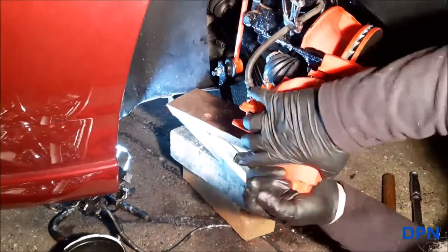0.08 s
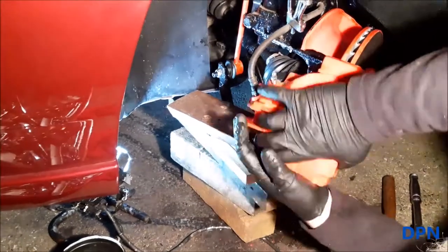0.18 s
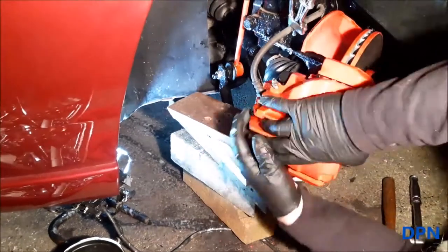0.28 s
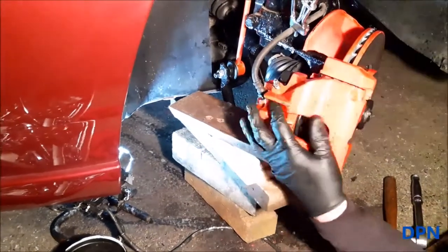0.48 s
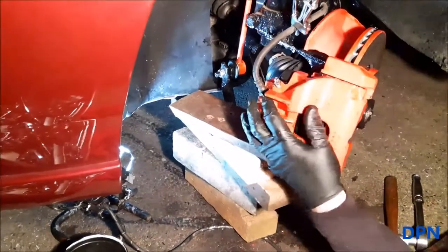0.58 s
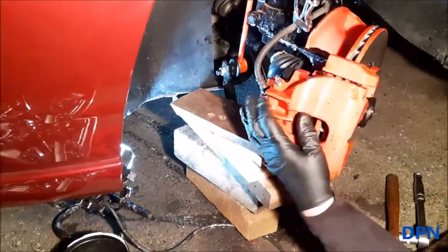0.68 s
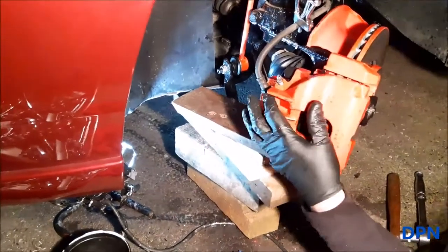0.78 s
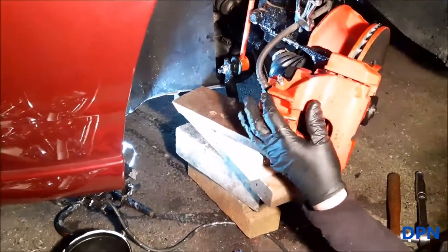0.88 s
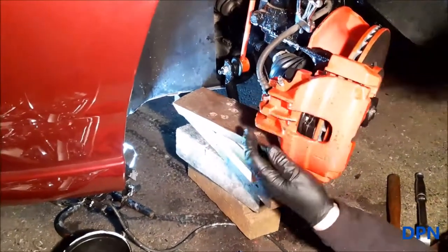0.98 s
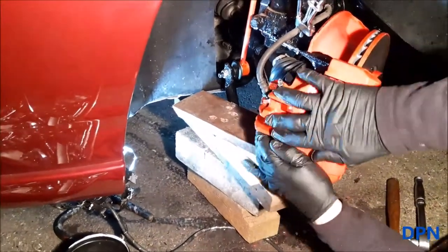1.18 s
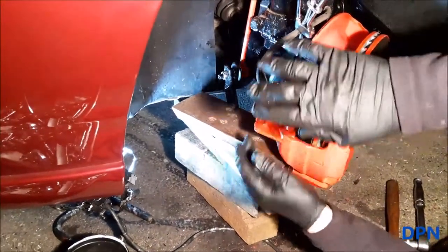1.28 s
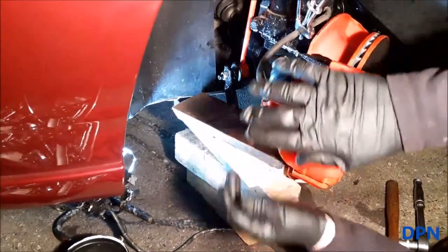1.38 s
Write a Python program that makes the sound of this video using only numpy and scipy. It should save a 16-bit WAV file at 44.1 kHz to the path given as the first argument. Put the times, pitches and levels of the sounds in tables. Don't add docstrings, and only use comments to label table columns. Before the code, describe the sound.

Metal brake caliper knocks, heard close in a quiet garage with a short dull tail. A faint thud and glove rub open; at 0.2 and 0.26 seconds two sharp, bright steel clacks land over a hollow low thud. A rubber glove hisses over paint near 0.37, a lighter clink-thud comes at 0.6, softer rubs follow, then small ticks and dull taps around 1.0 to 1.24, fading to near quiet.

```python
import sys
import numpy as np
from scipy import signal
from scipy.fft import rfft, irfft
from scipy.io import wavfile
from scipy.ndimage import uniform_filter1d

SR = 44100
rng = np.random.default_rng(int(sys.argv[2]) if len(sys.argv) > 2 else 0)


def store_wav(level_fs):
    pcm = np.round(np.clip(np.atleast_2d(level_fs), -1, 1) * 32767)
    wavfile.write(sys.argv[1], SR, pcm.T.astype(np.int16))


def ratio_of_db(decibels):
    return 10 ** (np.asarray(decibels, float) / 20)


N = 61740
TIME_S, FREQ_HZ = np.arange(N) / SR, np.fft.rfftfreq(N, 1 / SR)
BLOW_N = 8192


def evened(x):
    return x / np.sqrt(np.mean(x ** 2) + 1e-20)


def lumpy(n, size):
    return evened(uniform_filter1d(rng.standard_normal(n), size=size))


def read(points, hz):
    f, value = np.transpose(points)
    return np.interp(np.log(hz + 1), np.log(f + 1), value)


def noise(gain):
    return evened(irfft(rfft(rng.standard_normal((2, N))) * gain, N))


def hump(centre_hz, octaves):
    return np.exp(-.5 * (np.log2((FREQ_HZ + 1) / centre_hz) / octaves) ** 2)


# start t/s, fastest t/s, end t/s, level/dB, dull share/dB
STROKES = [
    (-.03, 0.009, 0.09, -52.5, -17.5),
    (0.113, 0.149, 0.19, -69.5, 2.5),
    (0.312, 0.369, 0.56, -41.5, -4.5),
    (0.546, 0.557, 0.72, -69, 11.5),
    (0.612, 0.689, 0.76, -48.5, -2.5),
    (0.745, 0.756, 0.84, -57, 5.5),
    (0.76, 0.839, 1.102, -50, -11),
    (0.93, 1.009, 1.38, -62.5, -2.5),
    (1.086, 1.168, 1.143, -63.5, 14),
    (1.187, 1.226, 1.279, -43.5, -9),
]
# f/Hz, level/dB per Hz
GLOVE_SPECTRUM = [(590, -64), (1000, -7.5), (1570, -31), (1770, -14), (5070, -9), (7190, -7), (8360, -5),
                  (16000, -5)]
# f/Hz, width/Hz, level/dB
SQUEAK = [(2500, 660, 0), (3790, 220, 1.5), (5500, 430, -4), (7170, 750, 0.5), (10100, 260, -20)]


def glove_hiss():
    drift, drift_hz, patch_db = 0.014, 9.9, 2.5
    _, t, z = signal.stft(noise(1), SR, nperseg=256)
    bend = 1 + drift * np.sin(2 * np.pi * drift_hz * t + .5)
    hz = np.fft.rfftfreq(256, 1 / SR)[:, None] / bend
    bands = 1
    for f, width_hz, db in SQUEAK:
        bands = bands + ratio_of_db(db + 11.5) / (1 + (2 * (hz - f) / width_hz) ** 2)
    patch = uniform_filter1d(rng.standard_normal(hz.shape), size=8, axis=0)
    patch = evened(uniform_filter1d(patch, size=30, axis=1))
    colour = bands * ratio_of_db(read(GLOVE_SPECTRUM, hz) + patch_db * patch) * hz / (hz + 700)
    hiss = signal.istft(z * colour, SR, nperseg=256)[1]
    return evened(hiss[:, :N])


def gloves():
    ends_db, grain_db = -34.5, 1
    hiss = glove_hiss()
    drag = noise(hump(1900, 1.48))
    grain = ratio_of_db(grain_db * lumpy(N, 90))
    out = np.zeros((2, N))
    for start, fastest, end, db, dull_db in STROKES:
        away = np.interp(TIME_S, [start, fastest, end], [1, 0, 1])
        out += (away < 1) * ratio_of_db(db + ends_db * away ** 1.443) * (hiss + ratio_of_db(dull_db) * drag)
    return out * grain


# f/Hz, level/dB per Hz
AIR_SPECTRUM = [(120, -33), (220, -3.5), (700, -29.5), (16000, -36)]


def air():
    level_db = -71
    return ratio_of_db(level_db) * noise(ratio_of_db(read(AIR_SPECTRUM, FREQ_HZ)))


def blows(rows, octaves, skirt_db, reach):
    ripple_db, treble_fade = 3, 1.2
    snap, snap_s = 0.32, 0.00013
    out = np.zeros((2, N + BLOW_N))
    t, f = np.arange(BLOW_N) / SR, np.fft.rfftfreq(BLOW_N, 1 / SR)
    for s, db, hz, rise_s, t60_s in rows:
        away = np.log2((f + 1) / hz) / octaves
        colour = np.exp(-.5 * away ** 2) + ratio_of_db(skirt_db) * np.exp(-away ** 2 / 12)
        colour *= ratio_of_db(ripple_db * lumpy(len(f), int(hz / 60)))
        colour /= 1 + (f / (reach * hz)) ** 4
        z = rfft(np.clip(rng.standard_normal((2, BLOW_N)), -1.5, 1.5)) * colour
        treble = 1 / (1 + (1.3 * hz / (f + 1)) ** 4)
        fall_db = -60 * np.maximum(t - rise_s, 0) / t60_s
        burst = irfft(z * (1 - treble)) * ratio_of_db(fall_db) + irfft(z * treble) * ratio_of_db(treble_fade * fall_db)
        shape = np.minimum(t / max(rise_s, 1e-4), 1) * ratio_of_db(db) / np.std(irfft(z))
        shape *= 1 + snap * np.exp(-abs(t - rise_s) / snap_s)
        out[:, round(s * SR):][:, :BLOW_N] += burst * shape
    return out[:, :N]


def ring(x, modes, damp):
    out = np.zeros(x.shape)
    for k, (hz, width_hz, db) in enumerate(modes):
        r = np.exp(-np.pi * width_hz * damp / SR)
        poles = [1, -2 * r * np.cos(2 * np.pi * hz / SR), r * r]
        out += (-1) ** k * ratio_of_db(db) * signal.lfilter([1 - r, 0, r - 1], poles, x)
    return out


# t/s, level/dB
ROCK = [
    (0, -82),
    (.1, -69.5),
    (0.438, -68.5),
    (.53, -76),
    (0.699, -66),
    (0.922, -79.5),
    (1.099, -63),
    (1.25, -59),
    (1.36, -105.5),
]


def creep():
    t, db = np.transpose(ROCK)
    lump_db = 3.5
    lumps = lumpy(N, 500)
    return noise(hump(400, 0.91)) * ratio_of_db(np.interp(TIME_S, t, db) + lump_db * lumps)


# t/s, level/dB, f/Hz (centre), rise/s, t60/s
THUDS = [(.0595, -59.5, 930, 0.0025, 0.028), (.213, -31.5, 1160, 0.0031, 0.17),
         (.240, -35.5, 594, 0.0023, 0.21), (.260, -32.5, 820, 0.0064, 0.2),
         (.341, -40.5, 799, 0.012, 0.065), (.415, -51, 610, 0.0072, 0.031), (.49, -53, 740, 0.0027, 0.031),
         (.604, -35.5, 1560, 0.0036, 0.077), (.610, -39, 700, 0.0033, 0.071),
         (.626, -38, 860, 0.0038, 0.069), (.68, -74, 900, 0.0051, 0.052), (.765, -49, 730, 0.0022, 0.045),
         (.978, -62, 700, 0.0034, 0.03), (1.045, -60.5, 587, 0.003, 0.088),
         (1.113, -52.5, 940, 0.0045, 0.04), (1.155, -38, 737.3, 0.0047, 0.073),
         (1.169, -39, 1290, 0.0048, 0.034), (1.182, -40, 870, 0.0022, 0.047),
         (1.208, -48, 884, 0.0032, 0.074)]
# f/Hz, width/Hz, level/dB
CASTING_MODES = [(420, 120, 6), (504, 16, -1), (730, 19, -10), (947, 33, -6), (1156, 84, 3),
                 (1525, 22, -9.5), (1590, 37, -9.5), (2075, 80, 7)]


def casting():
    drive = blows(THUDS, octaves=1, skirt_db=-13.0, reach=3.9) + creep()
    return ratio_of_db(-3) * drive + ratio_of_db(-2) * ring(drive, CASTING_MODES, damp=0.95)


# t/s, level/dB, f/Hz, rise/s, t60/s
PINGS = [(0.0595, -43, 494, 0.0042, 0.045), (.213, -25.5, 434, 0.0087, 0.08),
         (.26, -35.5, 445, 0.0042, 0.35), (0.299, -41.5, 430, 0.0067, 0.1), (.348, -39.5, 1210, .009, .05),
         (.346, -41.5, 726, .009, 0.042), (.608, -45.5, 452, 0.0054, 0.095),
         (.0605, -52, 1104, 0.0018, 0.033), (1.157, -43, 490, 0.0041, 0.083),
         (1.169, -41, 856, 0.0046, 0.087), (0.414, -42.5, 1583, 0.0042, 0.034),
         (0.99, -45.5, 2550, 0.00067, 0.019), (1.025, -39, 3550, 0.0014, 0.0049),
         (1.027, -39.5, 4000, 0.0014, 0.0079), (.979, -51, 488, 0.0028, 0.043),
         (1.070, -48, 433.5, 0.016, 0.08), (1.169, -41.5, 620, 0.0048, .04),
         (1.116, -52.5, 1196, 0.0034, .03), (1.209, -45.5, 400, 0.018, 0.075)]


def pings():
    out, t = np.zeros(N + BLOW_N), np.arange(BLOW_N) / SR
    for s, db, hz, rise_s, t60_s in PINGS:
        twin = np.sin(2 * np.pi * (0.83 * hz * t + rng.random()))
        tone = np.sin(2 * np.pi * hz * t) + .5 * twin
        fall_db = -60 * np.maximum(t - rise_s, 0) / t60_s
        out[round(s * SR):][:BLOW_N] += tone * np.minimum(t / rise_s, 1) * ratio_of_db(db + fall_db)
    return np.array([out[:N], out[40:N + 40]])


# t/s, level/dB, f/Hz (centre), rise/s, t60/s
TICKS = [(.150, -53, 10400, 0.0036, 0.028), (0.3404, -38.5, 2500, 0.001, 0.07),
         (0.5473, -50.5, 5000, 0.00037, 0.031), (.5990, -42, 5000, 0.00017, 0.048),
         (.6043, -38, 4500, 0.00021, 0.02), (.6233, -31, 5000, 0.00068, 0.032),
         (.6245, -33.5, 6500, 0.00085, 0.014), (.6295, -43, 5500, 0.00069, 0.023),
         (0.7665, -40.5, 3258, 0.0012, 0.019), (.842, -51.5, 2070, 0.00059, 0.097),
         (.977, -52, 1940, 0.0012, 0.081), (.976, -54, 7600, .004, 0.038),
         (1.024, -49, 7070, 0.00091, 0.021), (1.027, -50, 2400, 0.00071, 0.013),
         (1.1173, -52, 2560, 0.0008, 0.025), (1.138, -50.5, 2240, .002, 0.036),
         (1.149, -48, 2050, 0.004, 0.092), (1.1552, -46.5, 4440, 0.0007, 0.032),
         (1.169, -35, 6260, 0.0011, 0.025), (1.173, -39, 2187, 0.00096, 0.042),
         (1.2322, -35.5, 3530, 0.00086, 0.007), (1.236, -46, 1890, 0.0012, 0.058),
         (1.327, -64.5, 10000, 0.0024, 0.14), (1.3701, -70.5, 6200, 0.00095, 0.13)]
# t/s, level/dB, f/Hz (centre), rise/s, t60/s
KNOCKS = [(.1765, -54.5, 6750, 0.0007, 0.056), (.1903, -29, 5640, 0.00027, 0.023),
          (.1993, -13.5, 6490, 0.0004, 0.0087), (.2030, -28.5, 4630, 0.0032, 0.096),
          (.2075, -27.5, 2920, .001, 0.031), (.2137, -11, 5000, 0.00038, 0.012),
          (.2160, -18, 2520, 0.0011, 0.029), (.2210, -21.5, 2300, 0.00042, 0.019),
          (.2250, -30, 1850, 0.00027, 0.11), (.2365, -33.5, 3975, 0.00058, .022),
          (.2560, -18, 5000, 0.0061, 0.059), (.2588, -12, 5500, 0.0011, 0.02),
          (.2603, -15, 2500, 0.00042, 0.033), (.2680, -21, 4420, 0.00086, 0.048),
          (.2712, -11, 7000, 0.0016, 0.022), (.2750, -16, 7000, 0.00041, 0.028),
          (.2780, -24, 3520, 0.0025, 0.039)]
# f/Hz, width/Hz, level/dB
STEEL_MODES = [(2157, 72, 5), (2520, 120, -4.5), (3510, 90, 2), (4130, 80, -1.5), (5380, 90, -1),
               (5600, 46, -10), (6700, 124, 6), (7330, 51, -3.5), (8096, 110, 0.5), (8936, 33, 3),
               (8920, 100, 2), (11000, 230, -3)]


def steel():
    hits = blows(KNOCKS, octaves=1, skirt_db=-8.5, reach=3.7)
    hits = hits + blows(TICKS, octaves=0.77, skirt_db=-11.5, reach=1.87)
    return hits + ratio_of_db(-3.5) * ring(hits, STEEL_MODES, damp=1.3)


# t/s, level/dB, f/Hz, length/s
BUMPS = [
    (0.277, -67.5, 55.4, .04),
    (0.64, -69, 45, 0.02),
    (1.16, -79.5, 45, 0.05),
    (.225, -72, 79.5, 0.044),
    (.6, -76, 119, 0.025),
    (1.013, -83.5, 60, .03),
    (1.23, -79, 99.5, 0.019),
    (1.342, -61, 63.6, 0.014),
    (1.39, -72.5, 88.2, 0.045),
]


def bumps():
    out = np.zeros(N)
    for s, db, hz, length_s in BUMPS:
        t = TIME_S - s
        out += ratio_of_db(db) * np.exp(-(t / length_s * 2) ** 2) * np.cos(2 * np.pi * hz * t)
    return out


# start t/s, fastest t/s, end t/s, level/dB, f/Hz (centre)
SINGS = [
    (0.335, 0.37, 0.495, -46.5, 7250),
    (0.345, 0.386, 0.97, -59, 10090),
    (.63, 0.688, 0.73, -51.5, 9420),
    (0.634, 0.67, 0.77, -58.5, 6600),
    (0.663, 0.68, 0.76, -61, 3270),
    (.78, 0.83, 1.05, -55.5, 7250),
    (0.81, 0.87, 0.91, -58, 15000),
    (0.86, 0.912, .97, -62.5, 5000),
    (0.785, 0.808, 0.87, -59.5, 2360),
    (1.191, 1.224, 1.244, -50, 7060),
]


def sings():
    ends_db, width_share = -24.5, .035
    out = np.zeros((2, N))
    for start, fastest, end, db, hz in SINGS:
        away = np.interp(TIME_S, [start, fastest, end], [1, 0, 1])
        band = noise(1 / (1 + ((FREQ_HZ / hz - 1) / width_share) ** 2))
        out += (away < 1) * ratio_of_db(db + ends_db * away ** 2) * band
    return out


def garage(x):
    t60_s, top_hz, level_db = 0.074, 5000, -18.5
    t = np.arange(6000) / SR
    taps = rng.standard_normal(6000) * ratio_of_db(-60 * t / t60_s) * (t > .003)
    taps = signal.lfilter(*signal.butter(1, [600, top_hz], "band", fs=SR), taps)
    taps = taps[None] / np.linalg.norm(taps)
    return ratio_of_db(level_db) * signal.fftconvolve(x, taps, axes=1)[:, :N]


# f/Hz, likeness (0-1)
SAME = [(400, .985), (1500, .92), (2800, .87), (4500, .72), (15000, .62)]
# f/Hz, phase/rad
LEAD = [(400, -.1), (2000, -.35), (6000, -1.3)]
# f/Hz, level/dB
SIDES = [(400, 0), (2000, -1.5), (4500, -3), (9000, -3)]


def ports(x):
    a, b = rfft(x)
    same, tilt = np.clip(read(SAME, FREQ_HZ), 0, 1), ratio_of_db(read(SIDES, FREQ_HZ) / 2)
    shared = same * a * np.exp(-1j * read(LEAD, FREQ_HZ))
    right = (shared + np.sqrt(1 - same ** 2) * b) / tilt
    return irfft(np.array([a * tilt, right]), N)


def scene():
    near = gloves() + casting() + pings() + steel() + sings()
    low_cut_hz = 170
    near = signal.sosfilt(signal.butter(4, low_cut_hz, "high", fs=SR, output="sos"), near)
    return ports(near + garage(near) + air()) + bumps()


def top_cut(x):
    return signal.sosfilt(signal.butter(12, 16970, fs=SR, output="sos"), x)


def record(dry):
    limit, edge_hz = 1.2, 16000
    x = limit * np.tanh(dry / limit)
    low_pass = signal.firwin(511, edge_hz, window=("kaiser", 9), fs=SR)
    x = signal.oaconvolve(x, low_pass[None], "same")
    return top_cut(x)


dry = scene()
out = record(dry)
store_wav(out)
```